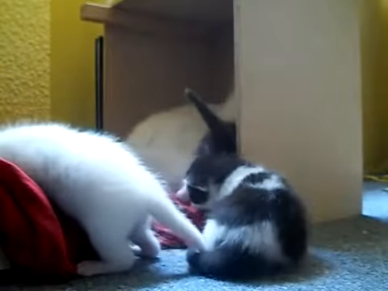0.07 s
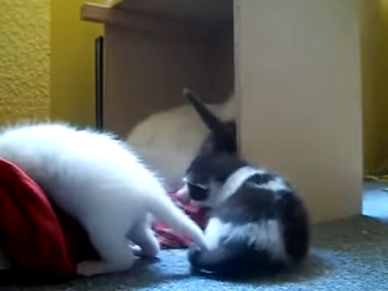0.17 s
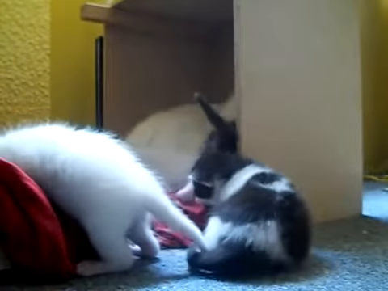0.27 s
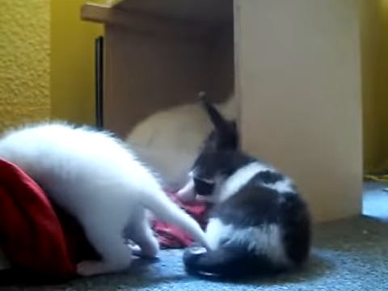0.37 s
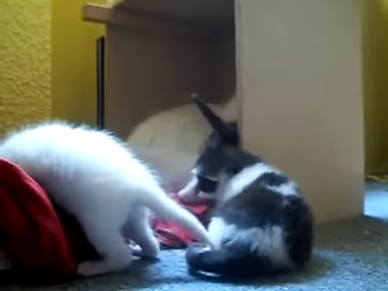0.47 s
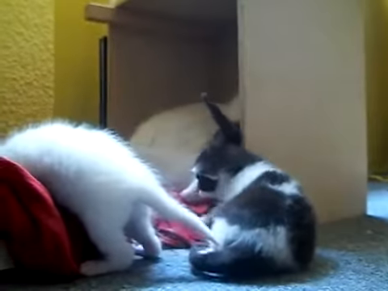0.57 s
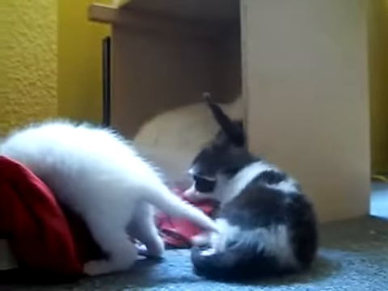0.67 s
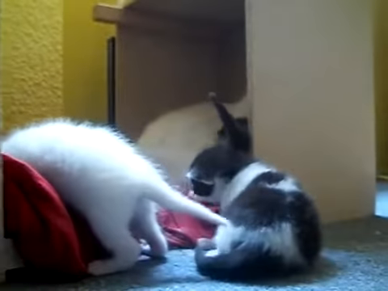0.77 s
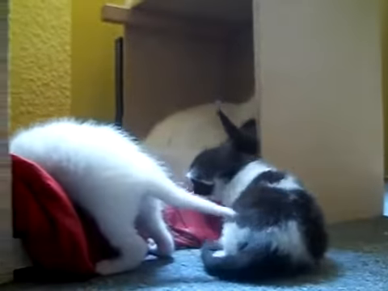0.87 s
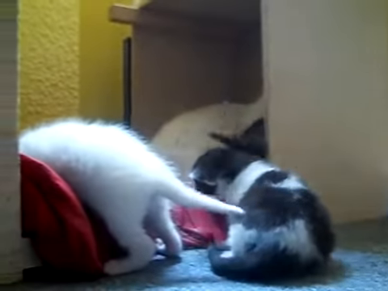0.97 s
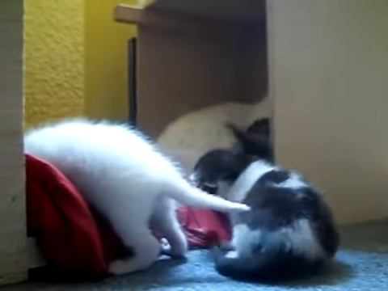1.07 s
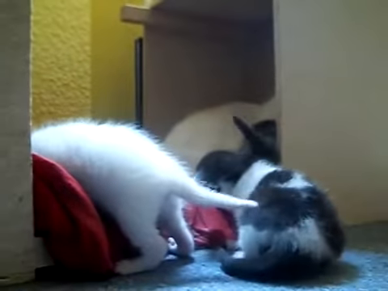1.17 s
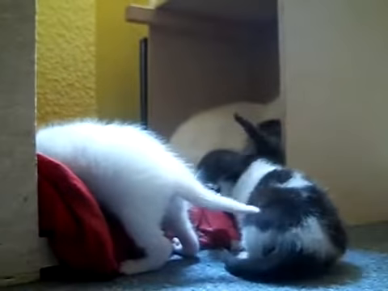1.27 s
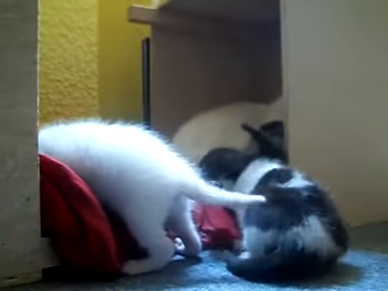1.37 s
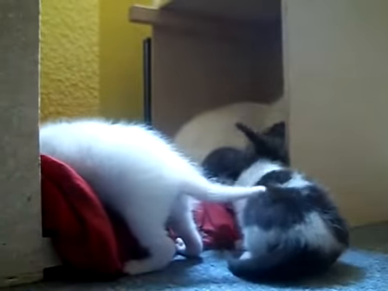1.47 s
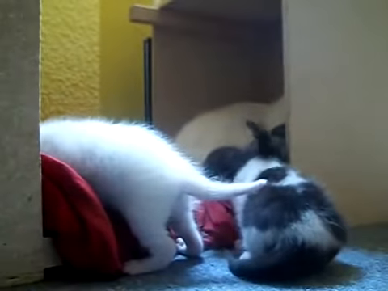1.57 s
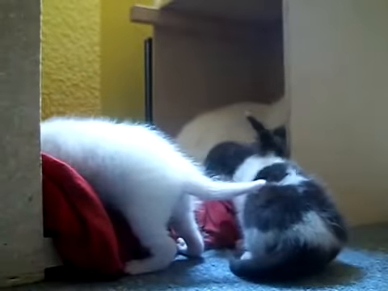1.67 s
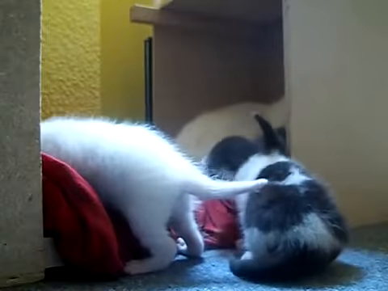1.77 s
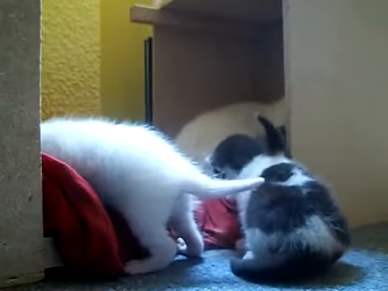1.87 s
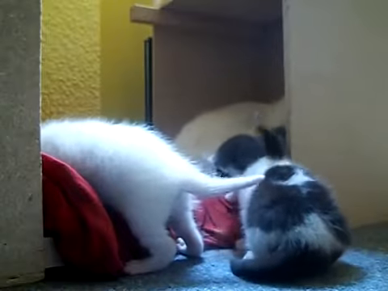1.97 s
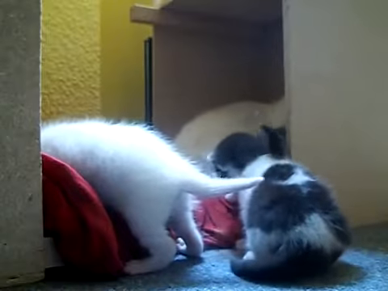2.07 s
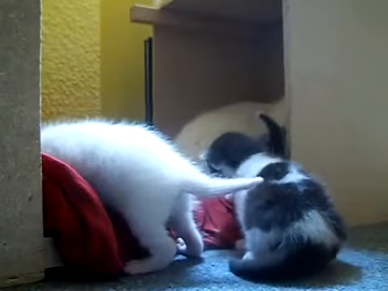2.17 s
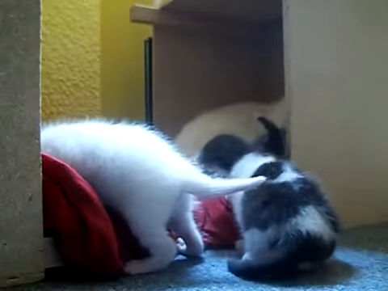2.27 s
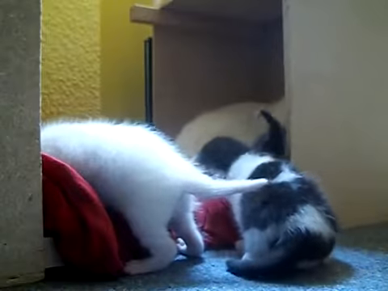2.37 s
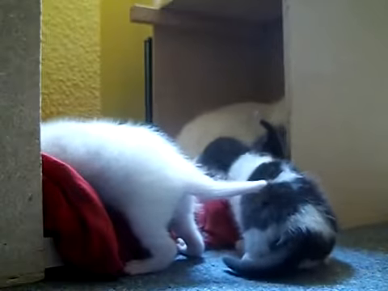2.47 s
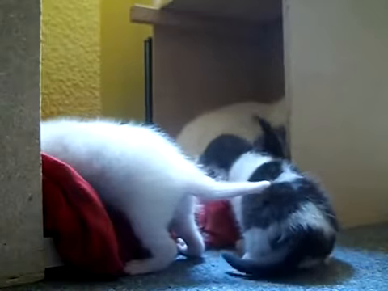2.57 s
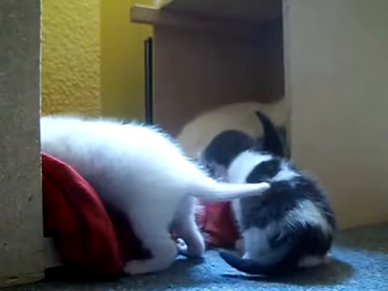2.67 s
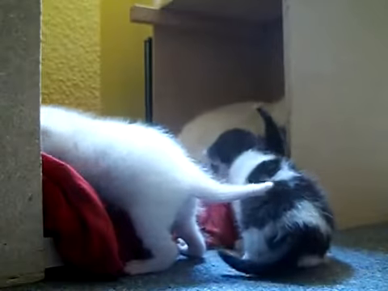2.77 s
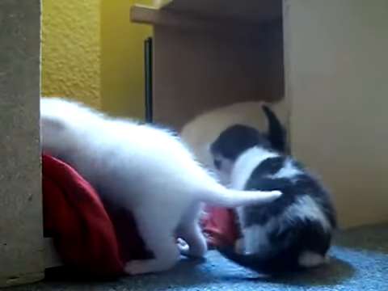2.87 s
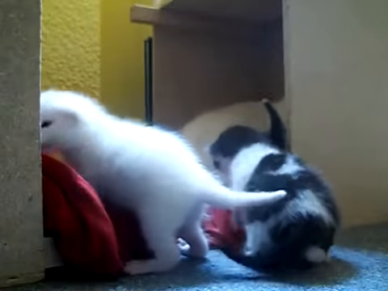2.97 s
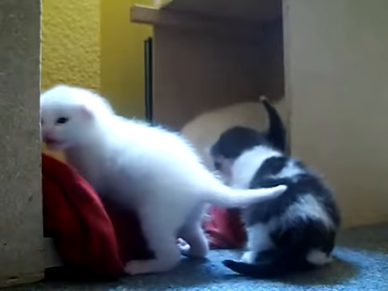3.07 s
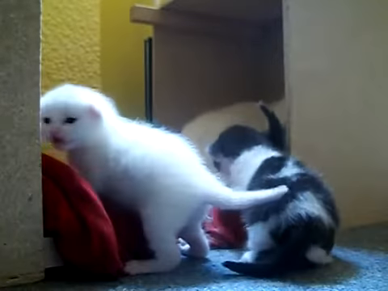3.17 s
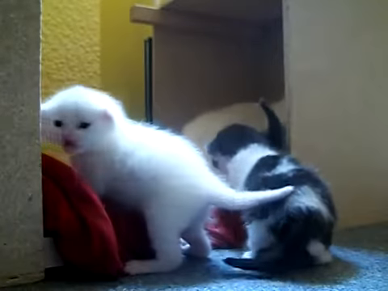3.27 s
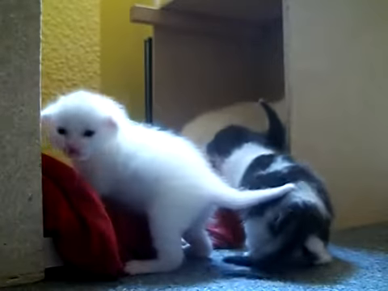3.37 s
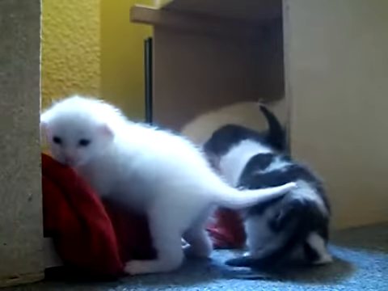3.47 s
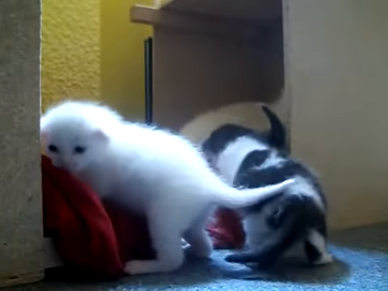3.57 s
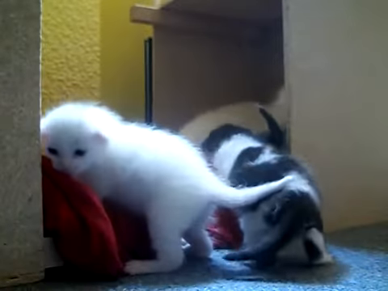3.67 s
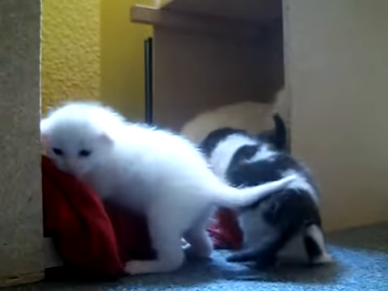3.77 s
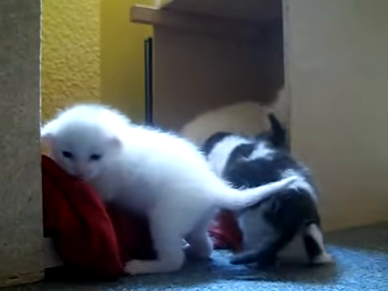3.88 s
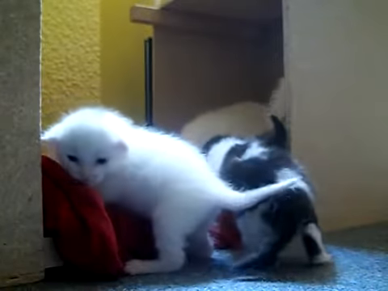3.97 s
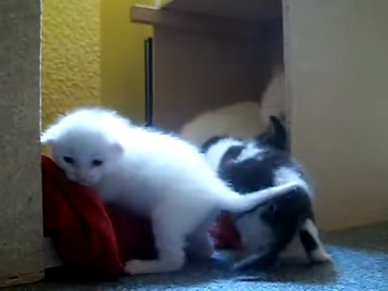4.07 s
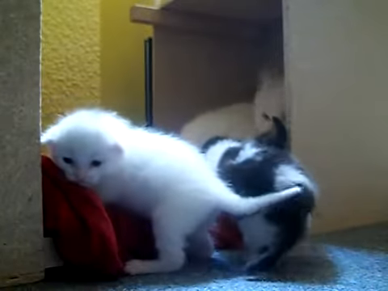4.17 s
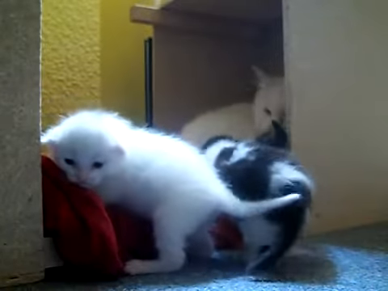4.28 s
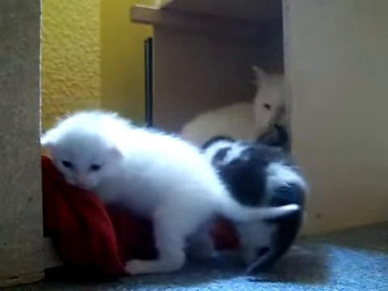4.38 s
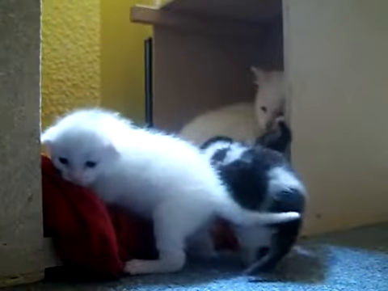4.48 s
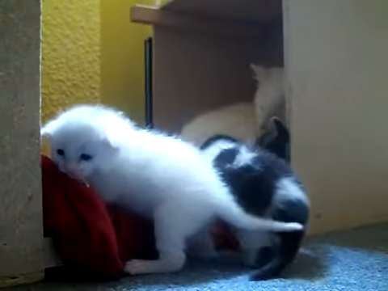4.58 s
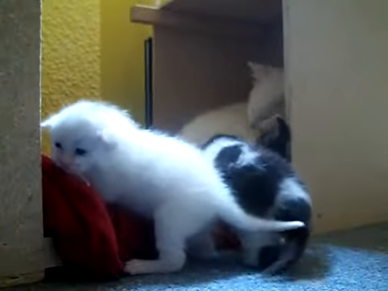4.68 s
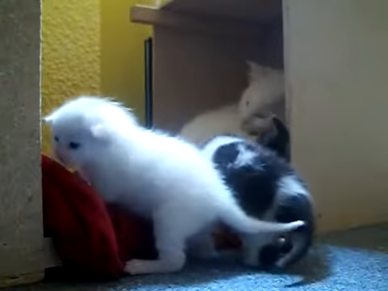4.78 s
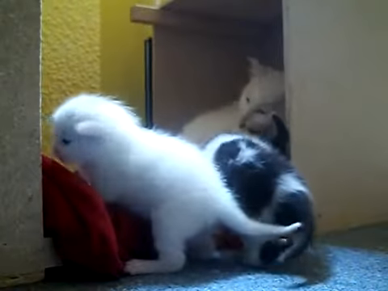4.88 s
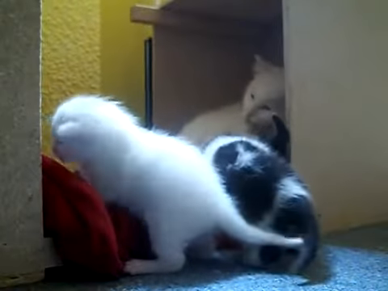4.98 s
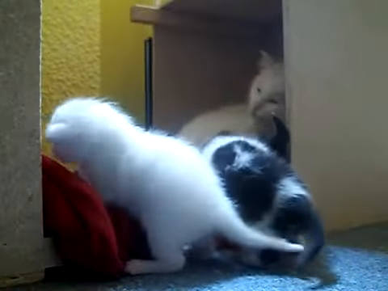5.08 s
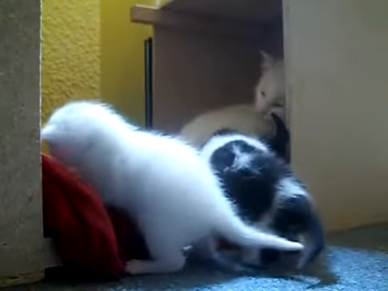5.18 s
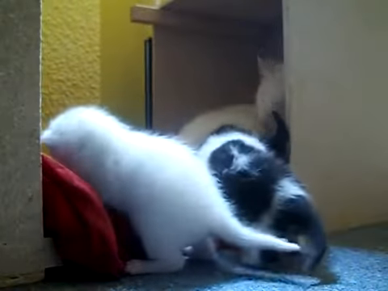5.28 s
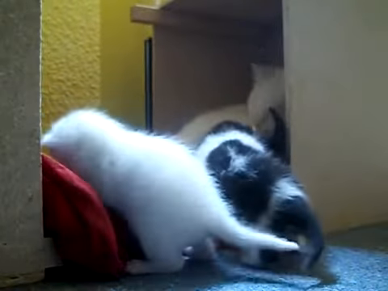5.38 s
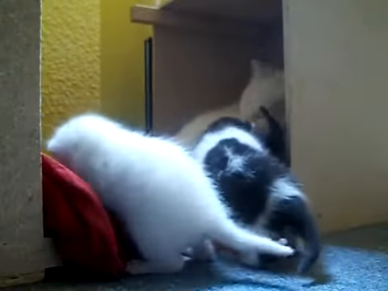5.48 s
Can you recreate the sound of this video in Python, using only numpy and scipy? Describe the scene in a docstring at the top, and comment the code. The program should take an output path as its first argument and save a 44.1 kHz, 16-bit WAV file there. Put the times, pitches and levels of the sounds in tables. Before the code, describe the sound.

A dull, narrow-band indoor sound with a slightly live room, taken close to the floor. Steady soft hiss, uneven low rumble and a swelling deep drone run throughout, with a barely audible whine. From 0.3 s cloth rustles and a claw ticks; at 0.6 s there is a short tap with a woody bump. A low microphone nudge comes near 0.75 s, and a softer slide peaks around 1 s. Sharp bright claw clicks and a thud at about 1.45-1.5 s lead into a thin, rising, raspy squeak until 1.9 s. Sparse taps and ticks follow at 2.05-2.65 s. At 2.96 s a long, loud, piercing mew rises, holds and sinks until 3.6 s; a lower second kitten overlaps from 3.2 to 3.5 s. Another gentle microphone nudge follows around 3.7 s. After a quieter gap, a light tap at 4.64 s precedes a faint falling chirp at 4.7-4.8 s. A weak, hoarse, lower mew wavers from 5.1 s to the end.

```python
"""At the mouth of a wooden cubby kittens clamber about, with the microphone on the floor beside them. One
squeaks, one gives a long mew that a second joins, a short chirp and a lower, fainter mew follow: sums of
harmonics shaped by a mouth resonance. Claws and paws are decaying noise, bumps decaying sines, and something
soft, and near 1 s the microphone itself, slides over the floor as grainy noise. A low swelling drone (a
wavering sine), rumble, handling of the microphone, a faint whine and a steady hiss lie beneath."""
import sys
import numpy as np
from scipy import signal
from scipy.fft import rfft, irfft, next_fast_len
from scipy.io import wavfile
from scipy.ndimage import uniform_filter1d, map_coordinates

SR = 44100
rng = np.random.default_rng(int(sys.argv[2]) if len(sys.argv) > 2 else 0)


def store_pcm(level_fs):
    """Save levels as 16-bit WAV."""
    pcm = np.round(np.clip(level_fs, -1, 1) * 32767).astype(np.int16)
    wavfile.write(sys.argv[1], SR, np.atleast_2d(pcm).T)


N = 243851
TIME = np.arange(N) / SR  # seconds
SAMPLING_HZ = 12000  # the low sampling rate; its half also bounds the overtones of the voices
LEFT_LAG_SAMPLES = 3.7


def from_db(db):
    """Level law: decibels to amplitude gain."""
    return 10 ** (np.asarray(db) / 20)


def rms_one(x):
    """Normalisation by mean power: scale to rms 1."""
    return x / np.sqrt(np.mean(x ** 2) + 1e-20)


def in_time(rows, t=TIME):
    """Linear interpolation: each column of a curve, joined by straight lines."""
    seconds, *columns = np.transpose(rows)
    return [np.interp(t, seconds, column) for column in columns]


def drift(rate_hz, size=N):
    """Low-passed noise: a double pole leaves a smooth random wander of spread 1."""
    r = np.exp(-2 * np.pi * rate_hz / SR)
    wander = signal.lfilter([1], [1, -2 * r, r * r], rng.standard_normal(size + SR))
    return rms_one(wander[SR:])  # the first second lets the filter settle


def noise(colour):
    """Spectral shaping: white noise weighted by rows of (Hz, dB), at rms 1."""
    hz, db = np.transpose(colour)
    size = next_fast_len(N)
    bins_hz = np.fft.rfftfreq(size, 1 / SR)
    gain = from_db(np.interp(np.log(bins_hz + 1), np.log(hz), db))
    spectrum = rfft(rng.standard_normal(size)) * gain
    return rms_one(irfft(spectrum, size)[:N])


def resonate(x, hz, width_hz):
    """Damped resonance: a pole pair passes a band around hz with gain 1 on top."""
    r = np.exp(-np.pi * width_hz / SR)
    zeros = np.array([1, 0, -1]) * (1 - r * r) / 2
    poles = [1, -2 * r * np.cos(2 * np.pi * hz / SR), r * r]
    return signal.lfilter(zeros, poles, x)


def decays(rows):
    """Exponential decay: sudden touches die away by 60 dB in each t60, down to a floor at -180 dB."""
    envelope = np.zeros(N)
    for s, db, t60_s in rows:
        age = TIME[:N - int(s * SR)]
        envelope[N - len(age):] += from_db(db - 60 * np.minimum(age / t60_s, 3))
    return envelope


def swells(rows, rest_db):
    """Power addition: movements build to a peak and ease off, over a resting level."""
    power = from_db(rest_db) ** 2
    for s, db, rise_s, fall_s in rows:
        away = (TIME - s) / np.where(TIME < s, rise_s, fall_s)
        power = power + from_db(db) ** 2 * np.exp(-away ** 2)
    return np.sqrt(power)


def background(hiss_db=-57, whine_db=-71, drone_trim_db=0.0, rumble_trim_db=0.5):
    """Superposition of steady sources: drone, rumble, handling, a faint wavering tone and hiss."""
    # Level of the low drone. Each row: time in seconds, level before the trim in dB.
    drone_level = [(0, -61), (0.62, -64.5), (1.0, -54.6), (1.18, -63), (1.5, -56.5), (2.0, -66.5),
                   (2.42, -55.1), (2.68, -56.5), (2.95, -64.5), (3.48, -49), (3.95, -49.5), (4.25, -57.5),
                   (4.4, -67.5), (4.66, -50.5), (4.95, -55), (5.53, -69.5)]
    # Level of the rumble above the drone. Each row: time in seconds, level before the trim in dB.
    rumble_level = [(0, -62.5), (0.19, -60.8), (0.29, -51), (0.44, -52.5), (0.62, -63.5), (0.75, -52.5),
                    (1.3, -60), (1.72, -61), (2.0, -55.0), (2.15, -57), (2.6, -62), (3.27, -65),
                    (3.4, -58.5), (3.92, -65), (4.5, -60.5), (4.97, -56.5), (5.53, -60)]
    # The microphone is shifted. Each row: peak time in seconds, peak level in dB, rise and fall in seconds.
    nudges = [(.74, -49, 0.066, 0.2), (3.7, -54, 0.27, 0.3)]
    # Noise spectra. Each row: frequency in Hz, relative level in dB.
    rumble_colour = [(42, -47), (62, -2), (75, 1), (97, -2.5), (125, -20), (250, -40.5)]
    handling_colour = [(10, -9), (22, -1.5), (30, -4.5), (42, -13.5), (120, -57)]
    hiss_colour = [(30, -19.5), (60, -11.5), (110, 1), (160, 2.5), (260, -0.5), (335, -6.5), (500, -8),
                   (900, -8.5), (1800, -9.5), (3000, -7.5), (4200, -6.5), (5200, -11), (5600, -14),
                   (6000, -31.5)]

    drone_db, = in_time(drone_level)
    rumble_db, = in_time(rumble_level)
    drone_hz = 56.2 * (1 + .012 * drift(4))
    drone = np.sqrt(2) * np.sin(2 * np.pi * np.cumsum(drone_hz) / SR)
    whine = rms_one(resonate(rng.standard_normal(N), 328.1, 1.6))  # so narrow that noise becomes a tone
    rumble = from_db(rumble_db + rumble_trim_db) * noise(rumble_colour)
    handling = swells(nudges, rest_db=-59) * noise(handling_colour)
    hiss = from_db(hiss_db) * noise(hiss_colour)
    return from_db(drone_db + drone_trim_db) * drone + from_db(whine_db) * whine + rumble + handling + hiss


def rustle(grain_db=1.0, lump_db=2.0):
    """Stick-slip friction: fibres catch and let go, in small bright grains and coarser dull lumps."""
    # Sliding over the floor: something soft, and near 1.0 s the microphone itself. # Each row: peak time in
    # seconds, peak level in dB, rise and fall in seconds.
    slides = [(.33, -55, 0.054, 0.066), (.57, -57, 0.091, 0.14), (1.0, -47.5, 0.13, 0.16),
              (1.5, -56, 0.31, .3), (2.6, -64, 0.68, 1), (4.72, -61.5, 0.057, 0.11)]
    # A body shifts on the bedding. Each row: peak time in seconds, peak level in dB, rise and fall in seconds.
    shuffles = [(.28, -59, 0.084, 0.14), (.585, -51, 0.014, 0.037), (1.04, -53.5, 0.22, 0.12),
                (1.22, -50, 0.081, 0.096), (1.485, -55, 0.019, 0.014), (1.63, -56, 0.011, .035),
                (2.09, -57.5, 0.051, 0.014), (2.55, -63, .15, 0.13), (2.76, -55, 0.019, 0.019),
                (4.31, -61.5, 0.048, 0.024), (5.1, -60.5, 0.3, .08)]
    # Noise spectra of the two. Each row: frequency in Hz, relative level in dB.
    rustle_colour = [(60, -18.5), (160, -14), (330, -1), (600, 0.5), (1200, -3), (2200, -3), (3200, -1.5),
                     (4200, 3.5), (5200, -5.5), (6000, -22.5)]
    shuffle_colour = [(70, -13.5), (150, -8.5), (240, -5), (350, -1.5), (600, -8), (1000, -12.5),
                      (2000, -22)]

    grains = rms_one(noise(rustle_colour) * from_db(grain_db * drift(120)))
    lumps = rms_one(noise(shuffle_colour) * from_db(lump_db * drift(37)))
    return swells(slides, rest_db=-73) * grains + swells(shuffles, rest_db=-62.5) * lumps


def paws():
    """Impact excitation: claws ring in a narrow bright band, pads tap broadly, bodies bump the wood."""
    # Claws catching. Each row: start in seconds, level in dB, t60 in seconds.
    claw_ticks = [(.372, -41, 0.018), (1.441, -40, 0.024), (1.468, -41.5, 0.082), (1.478, -32.5, 0.062),
                  (1.486, -44, 0.033), (2.2445, -40.5, 0.049), (3.648, -47, 0.12), (4.638, -55, 0.11)]
    # Paws tapping and cloth crackling. Each row: start in seconds, level in dB, t60 in seconds.
    pad_taps = [(.338, -47.5, 0.065), (.587, -32, 0.01), (1.367, -43.5, .016), (1.621, -50, .027),
                (2.058, -43.5, 0.01), (2.074, -48.5, 0.055), (2.2445, -50, .02), (2.4155, -51, 0.11),
                (2.645, -49, .03), (4.638, -47, 0.074), (5.03, -57, 0.2)]
    # Soft bumps on the wood. Each row: start in seconds, peak level in dB, frequency in Hz, t60 in seconds.
    wood_bumps = [(0.5871, -38.5, 337, 0.056), (1.445, -41.5, 396, 0.045), (1.488, -34.5, 151, 0.034),
                  (1.622, -42, 1070, 0.039), (2.09, -47.5, 362, 0.088)]

    claw_band = resonate(resonate(rng.standard_normal(N), 4100, 600), 4620, 1800)
    ticks = decays(claw_ticks) * rms_one(claw_band)
    tap_colour = [(100, -13), (400, -2.5), (1000, 10.0), (2000, 12.5), (4200, 12), (6000, -33)]  # Hz, dB
    taps = decays(pad_taps) * noise(tap_colour)
    bumps = sum(decays([(s, db, t60_s)]) * np.sin(2 * np.pi * hz * (TIME - s))
                for s, db, hz, t60_s in wood_bumps)
    return ticks + taps + bumps


def rasp_of(pitch, t, flipped, hoarse_s, glide_rasp, end_rasp):
    """Irregular fold vibration: roughness rises at the start, when pressed, in fast glides and at the end."""
    held_rasp, pressed_rasp, most_rasp = 0.044, 0.12, 0.7  # the folds run almost clean on a held note
    start_rasp, end_s = .6, .035
    glide = uniform_filter1d(np.abs(np.gradient(np.log2(pitch), t)), size=SR // 40)  # octaves a second
    onset = start_rasp * np.exp(-((t - t[0]) / hoarse_s) ** 2)
    break_off = end_rasp * np.exp(-((t[-1] - t) / end_s) ** 2)
    rasp = held_rasp + pressed_rasp * (1 - flipped) + glide_rasp * glide + onset + break_off
    return np.clip(rasp, 0, most_rasp)


def mew(rows, hoarse_s, glide_rasp, end_rasp, early_db, late_db, flip_after_s, mouth_width_hz,
        leak_db, jitter, shimmer, air_db, air_hz):
    """Source and filter: the folds flip register once, the mouth lifts overtones near its resonance."""
    start, end = rows[0][0], rows[-1][0]
    edge_s, flip_s = .022, 0.014  # fade at either end, time scale of the register change
    span = (TIME > start - edge_s) & (TIME < end + edge_s)
    t = TIME[span]
    size = len(t)
    pitch, level_db, mouth_hz = in_time(rows, t)

    # early_db and late_db set overtones over fundamental, mostly from pressed to pure
    flipped = (1 + np.tanh((t - start - flip_after_s) / flip_s)) / 2
    rasp = rasp_of(pitch, t, flipped, hoarse_s, glide_rasp, end_rasp)
    richness = from_db(early_db + (late_db - early_db) * flipped + 1.5 * rasp)  # rasp also brightens

    # rasp shakes the pitch (jitter) and the level (shimmer)
    tremor = .004 * drift(70, size)
    pitch = pitch * (1 + tremor + jitter * rasp * drift(180, size))
    phase = 2 * np.pi * np.cumsum(pitch) / SR

    k = np.arange(2, 9)[:, None]  # harmonic numbers of the overtones
    # leak_db is what passes the mouth away from its resonance
    weights = 1 / (1 + ((k * pitch - mouth_hz) / mouth_width_hz) ** 2) + from_db(leak_db)
    weights = weights / (1 + (k * pitch / (SAMPLING_HZ / 2)) ** 30)  # steep loss above the band
    weights = weights / np.sqrt(np.sum(weights ** 2, axis=0))
    flutter = from_db([2.2 * drift(45, size) for _ in k])
    overtones = np.sqrt(2) * np.sum(weights * flutter * np.sin(k * phase), axis=0)

    # turbulent air escapes once a cycle, most when the voice is raspy
    air = rms_one(resonate(rng.standard_normal(size), air_hz, air_hz) * (1 + np.cos(phase)))
    fundamental = np.sqrt(2) * np.sin(phase)
    coloured = richness * (overtones + from_db(air_db) * rasp * air)
    voice = (fundamental + coloured) / np.sqrt(1 + richness ** 2)

    gate = np.clip(1 + np.minimum(t - start, end - t) / edge_s, 0, 1)
    out = np.zeros(N)
    out[span] = from_db(level_db) * voice * gate * (1 + shimmer * rasp * drift(220, size))
    return out


def kittens():
    """Individual vocal tracts: each call has its own resonance, register change and roughness."""
    # Paths of the calls. Each row: time in seconds, pitch in Hz, level in dB, mouth resonance in Hz.
    squeak = [(1.5, 995, -55, 2000), (1.535, 1150, -65, 3500), (1.56, 1225, -50.5, 4450),
              (1.6, 1216, -51, 4300), (1.615, 1351, -52, 2900), (1.65, 1546, -50.5, 3900),
              (1.665, 1830, -49, 3920), (1.7, 1937, -50, 4000), (1.73, 1982, -62, 3900),
              (1.76, 1955, -52.5, 3900), (1.915, 1875, -50.5, 3820)]
    long_mew = [(2.96, 796, -57, 1485), (3.01, 941, -50.5, 1900), (3.05, 1052, -58, 2600),
                (3.09, 1273, -44, 4590), (3.18, 1463, -43.5, 5300), (3.245, 1442, -40.5, 5640),
                (3.275, 1386, -39, 5450), (3.39, 1354, -38, 5450), (3.495, 1308, -38.5, 5170),
                (3.585, 1170, -44.5, 4980), (3.622, 1033, -47.5, 2150)]
    joining_mew = [(3.178, 819, -53, 1580), (3.195, 812, -42.5, 1650), (3.212, 1007, -48, 3000),
                   (3.26, 994, -45, 3060), (3.33, 1000, -51, 3020), (3.4, 1112, -46.5, 2650),
                   (3.505, 1112, -55.5, 2150)]
    chirp = [(4.715, 1560, -63, 3700), (4.75, 1495, -61, 3680), (4.8, 1415, -68.5, 3780)]
    low_mew = [(5.09, 401.4, -64, 1200), (5.125, 497, -57, 1110), (5.205, 581.6, -55, 1200),
               (5.245, 724, -58.5, 1450), (5.29, 774, -54, 1750), (5.35, 810, -58.5, 1950),
               (5.41, 768, -54.5, 1640), (5.47, 772, -60.5, 1800), (5.528, 637.4, -58, 1287)]

    calls = mew(squeak, hoarse_s=0.031, glide_rasp=0.065, end_rasp=0, early_db=13, late_db=-7,
                flip_after_s=0.193, mouth_width_hz=700, leak_db=-11, jitter=.05, shimmer=.8,
                air_db=2.5, air_hz=2600)
    calls += mew(long_mew, hoarse_s=0.051, glide_rasp=.035, end_rasp=0.52, early_db=5.5, late_db=-8.0,
                 flip_after_s=0.2, mouth_width_hz=160, leak_db=-7.0, jitter=.045, shimmer=0.65,
                 air_db=-3, air_hz=2030)
    calls += mew(joining_mew, hoarse_s=0.028, glide_rasp=.015, end_rasp=.05, early_db=7.5, late_db=-2.5,
                 flip_after_s=0.22, mouth_width_hz=630, leak_db=-18, jitter=0.043, shimmer=0.93,
                 air_db=-1, air_hz=2520)
    calls += mew(chirp, hoarse_s=.015, glide_rasp=.05, end_rasp=.6, early_db=-5, late_db=8,
                 flip_after_s=.04, mouth_width_hz=820, leak_db=-10, jitter=0.021, shimmer=.61,
                 air_db=3, air_hz=3570)
    calls += mew(low_mew, hoarse_s=.11, glide_rasp=0.022, end_rasp=0.47, early_db=-3.5, late_db=0.0,
                 flip_after_s=0.1, mouth_width_hz=370, leak_db=-21, jitter=0.103, shimmer=0.47,
                 air_db=6, air_hz=1500)
    return calls


def room(x, wet_db=-15, t60_s=0.33):
    """Diffuse reverberation: convolution with a short, dense decaying tail from the walls close by."""
    t = TIME[:SR // 2]
    tail = rng.standard_normal(len(t)) * from_db(-60 * t / t60_s) * (t > .003)
    tail = tail / np.sqrt(np.sum(tail ** 2))
    return x + from_db(wet_db) * signal.fftconvolve(x, tail)[:N]


def scene():
    """Interchannel delay: one microphone feeds both channels; above the bass the left is a moment late."""
    fade = np.clip(np.minimum(TIME, TIME[-1] - TIME) / .006, 0, 1)
    mono = (room(kittens() + paws()) + rustle() + background()) * fade
    upper = signal.sosfiltfilt(signal.butter(1, 140, "high", fs=SR, output="sos"), mono)
    late = map_coordinates(upper, [np.arange(N) - LEFT_LAG_SAMPLES], order=3, mode="nearest")
    return np.array([mono - upper + late, mono])


def record(dry):
    """Spectral imaging: a low sampling rate mirrors the band's top faintly upward; the rest is cut."""
    band_limit = signal.ellip(12, .1, 80, SAMPLING_HZ / 2 - 60, fs=SR, output="sos")
    narrow = signal.sosfilt(band_limit, dry)
    clock = TIME - np.array([[LEFT_LAG_SAMPLES / SR], [0]])  # the left channel's clock lags too
    mirrored = narrow * (1 + 2 * np.cos(2 * np.pi * SAMPLING_HZ * clock))
    smooth = signal.sosfilt(signal.butter(14, 5950, fs=SR, output="sos"), mirrored)
    return signal.sosfilt(signal.cheby1(14, .1, 7337, fs=SR, output="sos"), smooth)


dry = scene()
out = record(dry)
store_pcm(out)
```